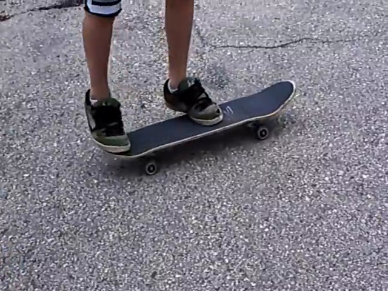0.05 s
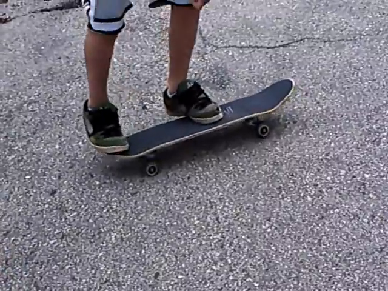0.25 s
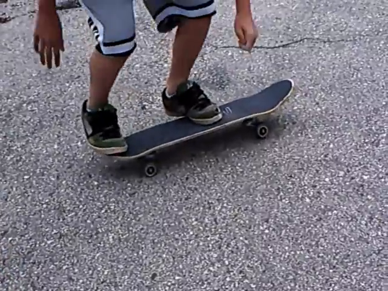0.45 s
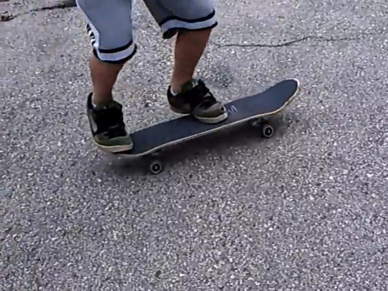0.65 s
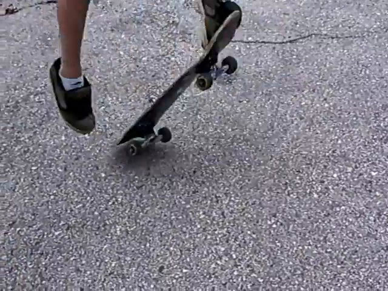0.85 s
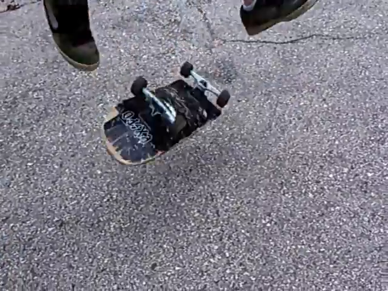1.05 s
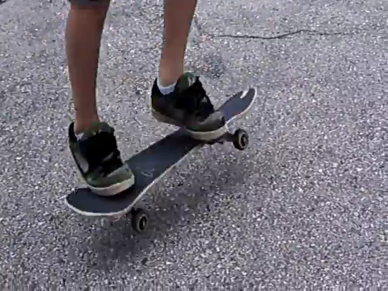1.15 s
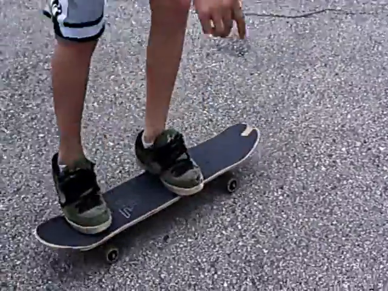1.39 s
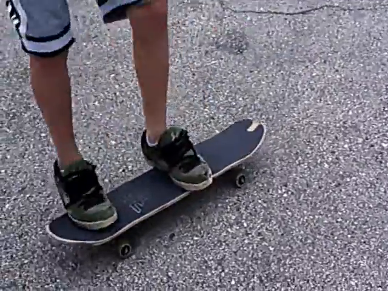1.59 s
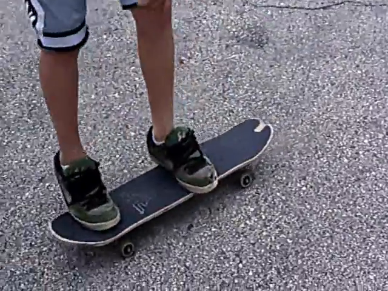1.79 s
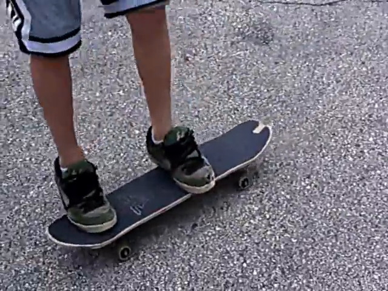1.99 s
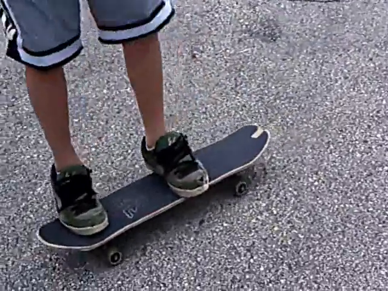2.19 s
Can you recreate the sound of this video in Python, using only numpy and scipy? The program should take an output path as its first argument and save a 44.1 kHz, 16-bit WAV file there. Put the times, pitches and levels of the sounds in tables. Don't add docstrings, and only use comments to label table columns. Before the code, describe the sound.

A skateboard flips and lands on asphalt. Small shoe ticks and gritty scuffs on the deck come at 0.1 to 1.0 s, then the tail pops at 1.1 s with a short rattle. Around 1.46 s the board slams down in a dense, distorted wood-and-metal clack, rattling until about 1.65 s. A few faint ticks follow over distant traffic, soft low thumps and a fading motor hum, outdoors.

```python
import sys
import numpy as np
from scipy import signal
from scipy.io import wavfile

SR = 44100
rng = np.random.default_rng(int(sys.argv[2]) if len(sys.argv) > 2 else 0)


def materialize(psi):
    bounded = np.clip(np.atleast_2d(psi).T, -1, 1)
    quanta = np.round(bounded * 32767).astype(np.int16)
    wavfile.write(sys.argv[1], SR, quanta)


def undo_db(level):
    steps = np.asarray(level, float) / 20
    return 10 ** steps


N = 98739


def rms_one(x):
    return x / np.sqrt(np.mean(x ** 2) + 1e-20)


def butter(x, order, hz, kind="low"):
    return signal.sosfilt(signal.butter(order, hz, kind, fs=SR, output="sos"), x)


def drift(rate_hz):
    r = np.exp(-80 * np.pi * rate_hz / SR)
    white = rng.standard_normal(N // 40 + 2002)
    slow = signal.lfilter([1], [1, -2 * r, r * r], white)[2000:]
    slow = rms_one(slow - slow.mean())
    return np.interp(np.arange(N) / 40, np.arange(len(slow)), slow)


def click(start_s, db):
    out = np.zeros(N)
    out[int(start_s * SR)] = undo_db(db)
    return out


def ring(clicks, hz, t60):
    r = undo_db(-60 / (max(t60, .002) * SR))
    w = 2 * np.pi * hz / SR
    return signal.lfilter([0, np.sin(w)], [1, -2 * r * np.cos(w), r * r], clicks + 1e-18)


def peak(x, hz, width_hz):
    r = np.exp(-np.pi * width_hz / SR)
    zeros = np.array([1, 0, -1]) * (1 - r * r) / 2
    return signal.lfilter(zeros, [1, -2 * r * np.cos(2 * np.pi * hz / SR), r * r], x)


def stroke(start_s, hold_s, db, t60):
    t = np.arange(N) / SR - start_s
    release = -60 * np.clip(t - hold_s, 0, 1) / max(t60, .005)
    return np.clip(t / .003, 0, 1) * undo_db(db + release)


def grains():
    grains_per_s, spread_db = 2300, 4
    sizes = undo_db(spread_db * np.minimum(rng.exponential(1, N), 4)) * rng.choice([-1, 1], N)
    return rms_one((rng.random(N) < grains_per_s / SR) * sizes)


# frequency in Hz, level in dB per Hz.
TRAFFIC_SPECTRUM = [(20, -9), (50, -6.5), (90, -6), (150, -8), (260, -10), (430, -21), (950, -16.5),
                    (2000, -36.5), (4300, -41.5)]


def traffic():
    level_db, patchy_db = -42.5, .7
    edges = 16 * 2 ** np.arange(0, 8.6, 1 / 3)
    hz, db = np.transpose(TRAFFIC_SPECTRUM)
    white = rng.standard_normal((2, N + SR))
    out = 0
    for k, (low, high) in enumerate(zip(edges, edges[1:])):
        band = butter(white[k % 2], 2, [low, high], "band")[SR:]
        band_db = np.interp(np.log(low * high) / 2, np.log(hz), db)
        out = out + band * undo_db(band_db + patchy_db * drift(8))
    return undo_db(level_db) * rms_one(out)


# time in seconds, level in dB.
HUM_SWELL = [(0, -43), (.5, -43.5), (.8, -42), (1.3, -43.5), (1.75, -46), (2.23, -51)]
# multiple of the hum pitch as a ratio, level in dB.
MOTOR_ORDERS = [(1 / 3, -7), (2 / 3, -11), (1, 0), (7 / 6, -10), (3 / 2, -10)]


def hum():
    pitch_hz, wander_hz, flutter_db = 147, .7, 1.0
    s, db = np.transpose(HUM_SWELL)
    level = undo_db(np.interp(np.arange(N) / SR, s, db) + flutter_db * drift(4))
    phase = 2 * np.pi * np.cumsum(pitch_hz + wander_hz * drift(3)) / SR
    tones = sum(undo_db(order_db) * np.sin(k * phase) for k, order_db in MOTOR_ORDERS)
    return np.sqrt(2) * level * tones


# start in seconds, peak in dB, pitch in Hz, t60 in seconds.
FAR_THUMPS = [(1.12, -34, 88, .3), (1.27, -39, 75, .4), (1.93, -36, 50, .3), (2.05, -37, 98, .25),
              (2.16, -33, 70, .25)]


def thumps():
    return sum(peak(ring(click(s, db), hz, t60), hz, .5 * hz) for s, db, hz, t60 in FAR_THUMPS)


def walls(x):
    level_db, t60_s, cut_hz = -36, 0.75, 4120
    t = np.arange(SR // 2) / SR
    gap = np.clip((t - .008) / 0.011, 0, 1)
    tail = butter(rng.standard_normal(len(t)) * undo_db(-60 * t / t60_s) * gap, 1, cut_hz)
    return undo_db(level_db) * signal.fftconvolve(x, tail / np.sqrt(np.sum(tail ** 2)))[:N]


# start in seconds, hold in seconds, level in dB, release t60 in seconds.
GRIT_SCUFFS = [(0.083, 0.029, -55, .02), (0.165, 0.021, -42, 0.01), (.388, .012, -53, .02),
               (0.428, 0.015, -51, 0.017), (.456, .01, -48, .02), (1.345, .01, -54, .03),
               (1.397, .01, -46, .03), (1.4595, .013, -21, .015), (1.479, .009, -21, .04),
               (0.728, 0.0076, -44, 0.017), (.955, 0.018, -51.5, 0.036), (0.99, 0.037, -55, 0.044),
               (1.069, 0.03, -47, .02), (1.104, 0.017, -30.5, 0.088), (1.138, 0.032, -45, 0.45),
               (1.409, .012, -38, 0.12), (1.497, 0.057, -33.5, 0.2), (1.68, 0.0074, -48, .05),
               (2.0, 0.24, -57.5, 0.045)]


def scuffs():
    low_hz, peak_hz, width_hz, peak_db = 1500, 4300, 1800, -6.5
    hiss = butter(grains() + 3.6 * rng.standard_normal(N), 2, low_hz, "high")
    hiss = rms_one(hiss + undo_db(peak_db) * peak(hiss, peak_hz, width_hz))
    return hiss * sum(stroke(*row) for row in GRIT_SCUFFS)


# pitch in Hz, level in dB, t60 in seconds.
DECK_MODES = [(145, -44.5, 0.057), (223.4, -10, 0.078), (286, -8, 0.093), (351.4, -5, 0.057),
              (527, -3, 0.067), (593, -5.5, 0.079), (700, 4, 0.017), (900, -8, 0.054), (999, -3.5, 0.017),
              (1087, 3.5, 0.019), (1507, -7, 0.024), (1800, -2.5, 0.025), (2116, -9.5, 0.029),
              (2440, -6, 0.01)]
# start in seconds, hold in seconds, level in dB, centre in Hz, release t60 in seconds.
DECK_RATTLES = [(0.313, 0.035, -48.5, 573, 0.15), (0.382, 0.024, -41.5, 776, 0.028),
                (0.433, 0.034, -41, 900, 0.032), (0.725, 0.016, -38.5, 1330, 0.01),
                (0.948, 0.014, -39.5, 1070, 0.041), (0.989, .02, -38, 750, 0.07),
                (1.067, 0.024, -45, 1500, 0.022), (1.103, 0.017, -30.5, 1180, 0.12),
                (1.143, 0.012, -30, 900, 0.03), (1.161, .01, -36, 900, .03), (1.175, .013, -32, 950, .04),
                (1.191, .008, -33, 1000, .04), (1.206, .02, -37, 900, .15), (1.248, 0.066, -44, 900, 0.33),
                (1.4, 0.035, -31, 1000, 0.073), (1.497, 0.015, -24, 926, 0.06),
                (1.519, .025, -22, 950, .12), (1.499, 0.07, -28, 415, 0.07), (1.53, .04, -25, 700, .1),
                (1.576, 0.022, -30, 800, 0.2), (1.5, 0.057, -31, 2017, .1), (1.625, 0.057, -47, 320, 0.32)]


def rattles():
    force = grains()
    push = 0
    for s, hold_s, db, hz, t60 in DECK_RATTLES:
        shake = force * stroke(s, hold_s, db, t60) + 1e-18
        push = push + peak(shake, hz, .5 * hz) * np.sqrt(SR / hz)
    modes = enumerate(DECK_MODES)
    return undo_db(-37) * sum((-1) ** k * undo_db(db) * ring(push, hz, t60) for k, (hz, db, t60) in modes)


# start in seconds, peak in dB, pitch in Hz, t60 in seconds.
SHORT_TICKS = [(0.0715, -43.5, 2230, .015), (.154, -55, 2300, .012), (0.2797, -29, 1810, 0.02),
               (.281, -36, 1055, 0.053), (0.436, -39.5, 2070, 0.017), (0.458, -27, 1800, 0.018),
               (.459, -25.5, 1030, 0.014), (0.4964, -41, 1500, 0.014), (0.5986, -43, 1760, 0.027),
               (1.079, -36, 4260, 0.012), (1.4672, 7, 4070, 0.005), (1.4618, 1, 986, 0.018),
               (1.4804, 3, 997, 0.032), (1.4625, -6, 575, .09), (1.539, -23, 880, .09),
               (1.508, -22, 600, .07), (1.1066, -21, 320, 0.08), (1.107, -25, 250, .06),
               (1.133, -36, 2100, .015), (1.18, -38, 2000, .02), (1.401, -30, 220, .08),
               (1.463, -8.5, 141, 0.091), (1.5416, -14.5, 348, 0.16), (1.521, -16, 330, .08),
               (1.556, -20, 348, .1), (1.521, -24, 1780, .03), (1.537, -24, 1800, .03),
               (1.539, -26, 2500, .02), (1.479, -10, 250, .08), (1.47, -14, 170, .07),
               (0.1705, -37, 4300, 0.019), (.7303, -36, 2400, 0.0067), (.731, -68, 4620, 0.022),
               (.733, -56, 755, .03), (1.688, -39, 1970, 0.021), (1.7938, -36, 1800, 0.0089),
               (1.962, -40, 1580, .012), (2.2144, -43, 2250, .025), (2.214, -46.5, 4490, 0.025)]


def ticks():
    out = np.zeros(N)
    for s, db, hz, t60 in SHORT_TICKS:
        knock = click(s, db)
        out += ring(knock, hz, t60)
        if hz > 500:
            out += undo_db(-15) * ring(knock, 1.16 * hz, t60 / 2)
    return out


def body(modes, start_s, db, contact_hz, damping):
    spread_db, contact_ratio = 4, 2.9
    start, out = int(start_s * SR), np.zeros(N)
    impulse = 1.0 * (np.arange(min(SR // 4, N - start)) == 0)
    force = peak(impulse, contact_hz, contact_ratio * contact_hz) * SR / (8 * contact_hz)
    luck = rng.standard_normal((len(modes), 2))
    for (hz, mode_db, t60), (strength, sign) in zip(modes, luck):
        gain = undo_db(db + mode_db + spread_db * strength) * np.sign(sign)
        out[start:start + len(force)] += ring(force, hz, damping * t60) * gain
    return out


# pitch in Hz, level in dB, t60 in seconds.
AXLE_MODES = [(2400, 9, 0.043), (2718, 2, 0.038), (3236, 5, 0.024), (3733, 7.5, 0.014), (4140, -1.5, 0.024),
              (4750, -4.5, 0.028), (5040, -3, 0.06)]
# start in seconds, deck in dB, thud pitch in Hz, axle in dB, thud in dB.
BOARD_BLOWS = [(.7285, -47, 970, -67, -28.5), (0.7382, -63, 700, -63, -23), (0.9577, -61, 810, -54, -30),
               (0.9673, -47.5, 688, -49, -20), (0.9969, -47, 710, -56, -30), (1.1054, -23.5, 760, -28, -4),
               (1.1092, -34, 700, -36, -13), (1.1304, -34, 730, -42, -19), (1.1628, -44, 800, -52, -24),
               (1.177, -59, 920, -60, -23), (1.3982, -40, 900, -57, -23.5), (1.4105, -37, 600, -37, -17),
               (1.4256, -44, 1000, -65, -17.5), (1.4561, -61, 594, -45, -12.5), (1.4601, -8, 599, -10, 13),
               (1.469, -11, 554, -11.5, 7), (1.4786, -4, 700, -24, 10), (1.4821, -10, 950, -14.5, 4),
               (1.4912, -20, 620, -29, 0), (1.5224, -39.5, 585, -31.5, -9), (1.538, -25, 960, -34, -12),
               (1.578, -46, 900, -56, -18), (1.4642, -16, 560, -18, 7), (1.4712, -22, 600, -20, 4),
               (1.4756, -28, 800, -28, -12), (1.4846, -19, 1150, -19, -1), (1.4868, -24, 580, -26, -5),
               (1.5085, -36, 400, -40, -12), (1.529, -37, 1000, -38, -17), (1.1165, -40, 1050, -40, -16),
               (1.1215, -44, 900, -46, -20), (1.1505, -46, 950, -52, -20), (1.1935, -50, 950, -55, -25),
               (1.2255, -55, 950, -60, -31), (1.4152, -46, 1300, -46, -21)]


def blows():
    out = np.zeros(N)
    for s, deck_db, hz, axle_db, thud_db in BOARD_BLOWS:
        out += body(DECK_MODES, s, deck_db - 12, hz, damping=0.83)
        out += body(AXLE_MODES, s, axle_db - 4, 4000, damping=0.67)
        out -= peak(ring(click(s, thud_db), hz, 0.021), hz, 2.92 * hz)
    return out


def scene():
    background = traffic() + hum() + thumps()
    board = butter(rattles() + scuffs() + blows() + ticks(), 2, 110, "high")
    return (board + walls(board) + background)[None]


def top_cut(x):
    return signal.sosfilt(signal.butter(12, 20000, fs=SR, output="sos"), x)


def record(dry):
    overload, knee, hiss_db, hold = .985, 12.0, -61, 4
    x = dry + 1.5 * peak(dry, 4380, 362)
    x = butter(x, 8, 5300)
    x = x / (1 + np.abs(x / overload) ** knee) ** (1 / knee)
    x = x + undo_db(hiss_db) * rng.standard_normal(x.shape)
    held = np.repeat(x[:, ::hold], hold, axis=1)[:, :N]
    held = signal.sosfiltfilt(signal.ellip(8, .1, 30, 15750, fs=SR, output="sos"), held)
    return top_cut(np.clip(held, -1, 1))


dry = scene()
out = record(dry)
materialize(out)
```